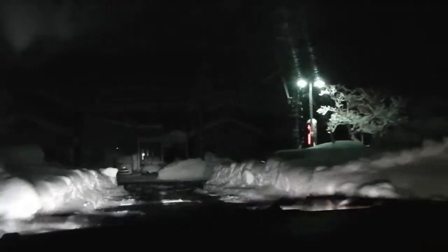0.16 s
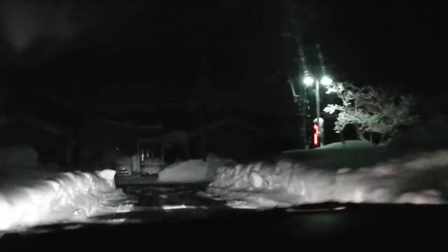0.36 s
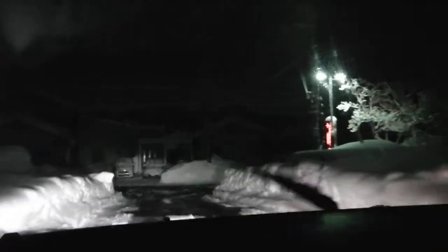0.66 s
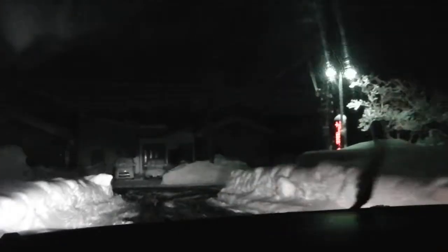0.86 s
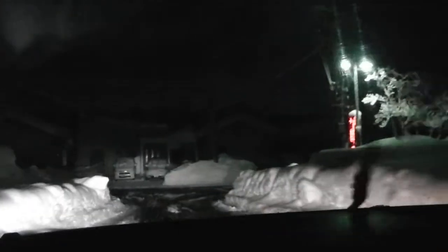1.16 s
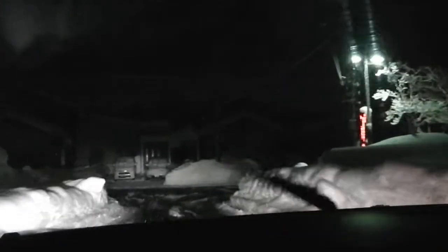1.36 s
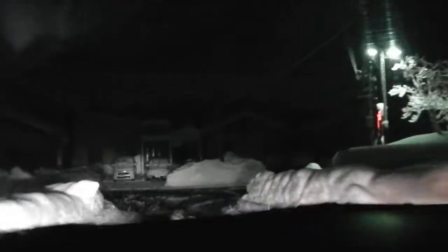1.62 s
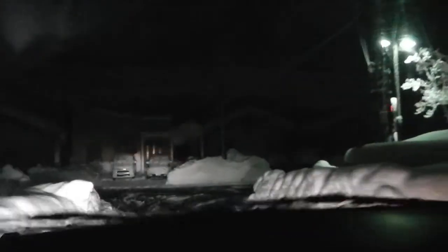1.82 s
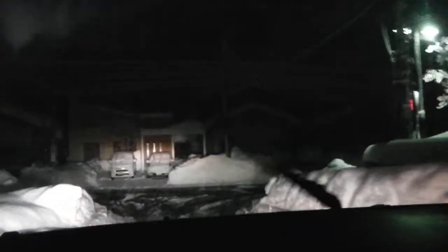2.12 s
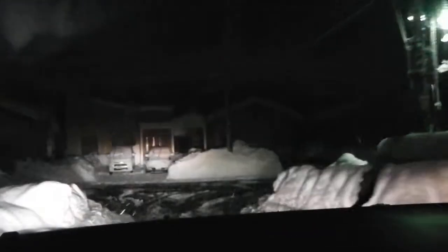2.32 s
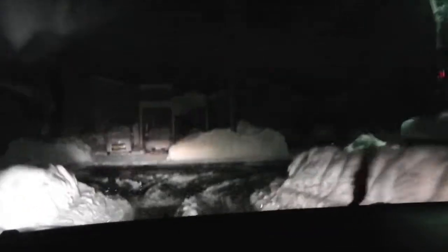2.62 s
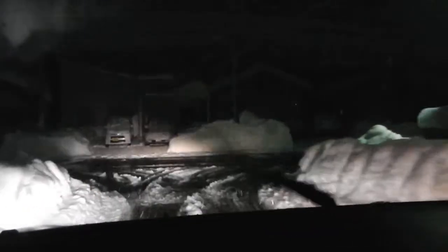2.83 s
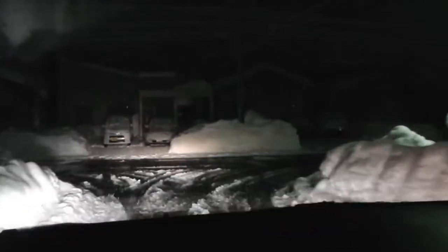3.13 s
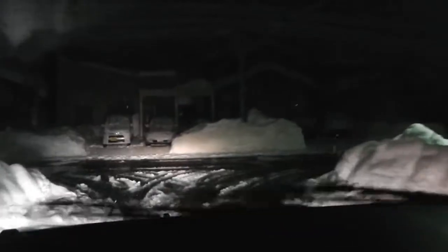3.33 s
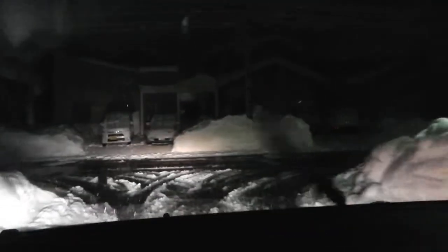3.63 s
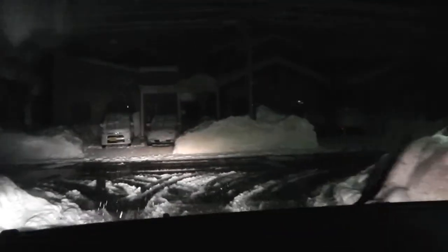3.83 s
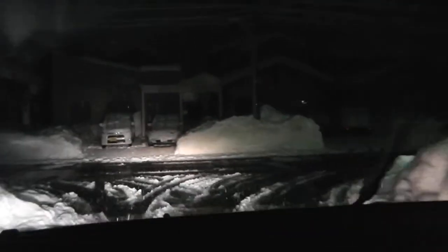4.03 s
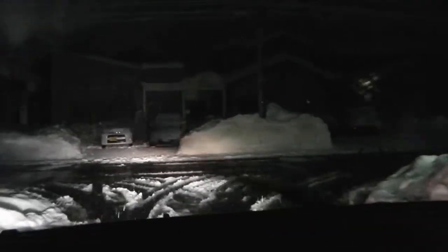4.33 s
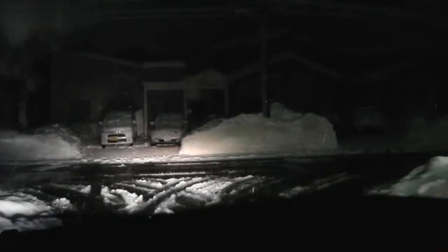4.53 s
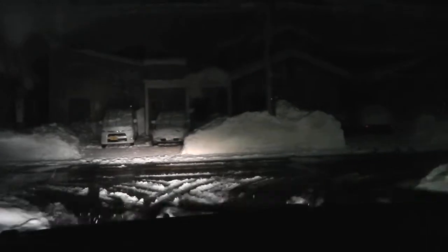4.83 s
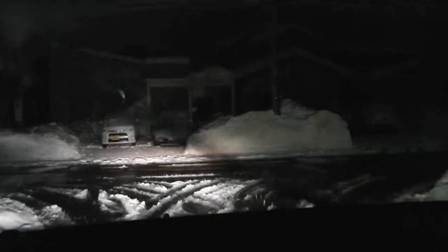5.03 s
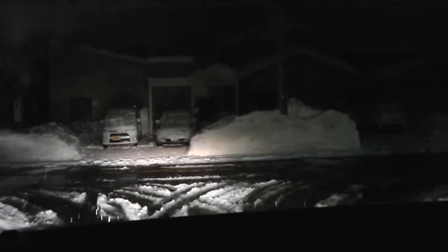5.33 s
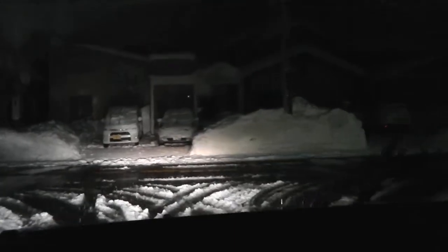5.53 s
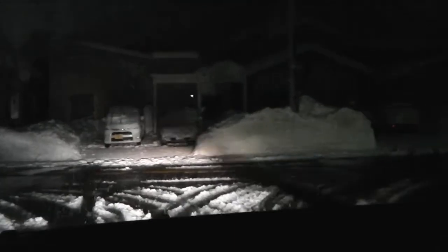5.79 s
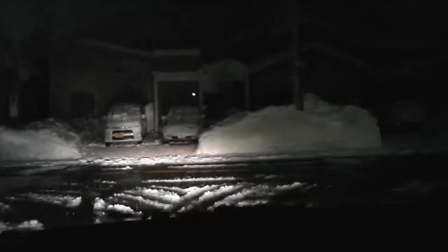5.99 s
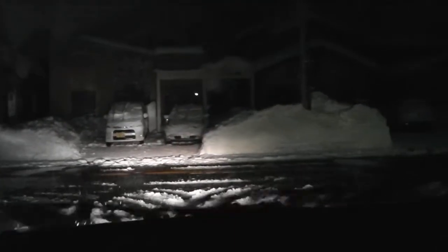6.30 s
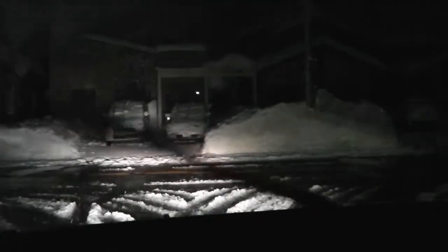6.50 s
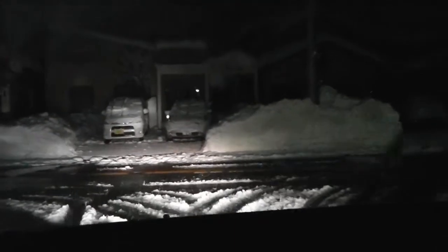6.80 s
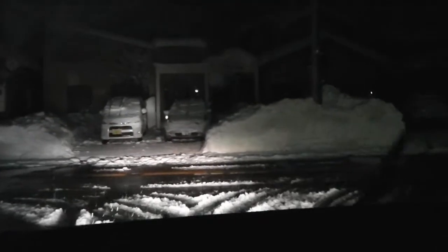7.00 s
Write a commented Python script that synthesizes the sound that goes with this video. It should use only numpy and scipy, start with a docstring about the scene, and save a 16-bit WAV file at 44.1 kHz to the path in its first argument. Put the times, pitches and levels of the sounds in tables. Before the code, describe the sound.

A car creeps over rutted snow, cabin booming softly; wiper blades judder and thump, a stalk clacks, and the turn signal ticks and tocks.

```python
"""Inside a car that creeps over a snowy road and slows for a junction: engine orders drone as sines,
while shaped noises make the heater's hiss, the tyres' rumble and the wash of slush. Drifting tones boom in the cabin.
Ruts, trim and stalk are struck modes and noise bursts; the wipers judder, flip and thump at each turn.
The driver flicks the indicator stalk, and its relay starts to tick and tock."""
import sys
import numpy as np
from scipy import signal
from scipy.fft import rfft, irfft, next_fast_len
from scipy.io import wavfile
from scipy.ndimage import map_coordinates

SR = 44100
rng = np.random.default_rng(int(sys.argv[2]) if len(sys.argv) > 2 else 0)


def generate_wav(signal):
    """Clip the signal to [-1, 1] and save it as 16-bit WAV at the path in sys.argv[1]."""
    frames = np.transpose(np.atleast_2d(signal))
    scaled = np.clip(frames, -1, 1) * 32767
    pcm = np.round(scaled).astype(np.int16)
    wavfile.write(sys.argv[1], SR, pcm)


N = 315315
TIME = np.arange(N) / SR  # the whole scene [s]
AGE = np.arange(SR // 4) / SR  # time since a blow [s]
MID_ONLY = np.array([[1], [0]])
# opposite halves of a level or time difference, for left and right
HALVES = np.array([[.5], [-.5]])
TILT_PIVOT_HZ = 3300  # a tilt leaves this pitch unchanged


def amp(db):
    """Decibels to gain."""
    return 10 ** (np.asarray(db) / 20)


def unit(x):
    """Scale to rms 1."""
    return x / np.sqrt(np.mean(x ** 2) + 1e-20)


def along(points, hz):
    """Read (frequency, value) points on a log frequency axis."""
    f, v = np.transpose(points)
    return np.interp(np.log(hz + 1), np.log(f + 1), v)


def curves(rows):
    """One value per sample for each column after the time."""
    s, *cols = np.transpose(rows)
    return [np.interp(TIME, s, c) for c in cols]


def wobble(rate):
    """A smooth random curve with rate knots a second."""
    knots = rng.standard_normal(int(N * rate / SR) + 4)
    return map_coordinates(knots, [TIME * rate])


def filtered(x, response):
    """Multiply the spectrum of x by a response of frequency."""
    n = x.shape[-1]
    m = next_fast_len(n + SR // 8)
    return irfft(rfft(x, m) * response(np.fft.rfftfreq(m, 1 / SR)), m)[..., :n]


def noise(spectrum, size=N):
    """Two unrelated noises (mid, side) of one colour, together at rms 1."""
    white = rng.standard_normal((2, size))
    return unit(filtered(white, lambda hz: amp(along(spectrum, hz))))


def tone(hz, drift):
    """A sine of rms 1 whose pitch strays by the share drift."""
    cycles = np.cumsum(hz * (1 + drift)) / SR
    return unit(np.sin(2 * np.pi * (cycles + rng.random())))


def fade(t60, attack):
    """The envelope of a blow: a quick rise, then free decay."""
    return (1 - np.exp(-AGE / attack)) * amp(-60 * AGE / t60)


def swell(s, rise_s, t60):
    """The envelope of a soft contact that builds to its peak at time s and then decays."""
    t = TIME - s
    rise = np.exp(-(np.minimum(t, 0) / rise_s) ** 2)
    return rise * amp(-60 * np.maximum(t, 0) / t60)


def burst(spectrum, t60, attack):
    """A blow of set energy on a part with many crowded, well damped modes."""
    envelope = fade(t60, attack)
    blow = noise(spectrum, size=len(AGE)) * envelope
    return blow * np.linalg.norm(envelope) / np.linalg.norm(blow, axis=1, keepdims=True)


def ring(modes, attack):
    """A blow on a part with a few clear modes, each time at slightly new strengths."""
    strengths = amp(2 * rng.standard_normal((len(modes), 2, 1)))
    # each mode reaches the side channel at a phase of its own
    phases = rng.uniform(0, 2 * np.pi, (len(modes), 1, 1)) * np.array([[0], [1]])
    total = 0
    for (hz, db, t60), strength, phase in zip(modes, strengths, phases):
        total = total + strength * amp(db) * np.sin(2 * np.pi * hz * AGE + phase) * fade(t60, attack)
    return total


def tilted(rows, slope_db):
    """Modes or spectrum points made brighter by slope_db per octave."""
    return [(hz, db + slope_db * np.log2(hz / TILT_PIVOT_HZ), *rest) for hz, db, *rest in rows]


def add(track, s, sound):
    """Lay a sound into a track at time s."""
    part = track[:, max(round(s * SR), 0):][:, :sound.shape[1]]
    part += sound[:, :part.shape[1]]


# the car rolls steadily, then slows to a crawl: (time [s], speed [share of the fastest])
SPEED = [(0, 1), (.8, 1), (2.3, 0.92), (3.6, 0.51), (5.2, 0.41), (6.5, 0.31), (7.15, 0.45)]


def with_speed(full_db, doubling_db):
    """Level of a noise that grows with speed: dB at full speed, dB gained per doubling."""
    speed, = curves(SPEED)
    return full_db + doubling_db * np.log2(np.maximum(speed, 1e-2))


# air from the vents: (frequency [Hz], relative level [dB/Hz])
HEATER = [(500, -41), (1100, 6), (1350, 1.5), (1650, 5), (2050, 2), (2500, 1.5), (2950, 1.5), (3800, -2.5),
          (5000, -8), (7000, -14), (9000, -13.5), (16000, -24)]
# the finest treble: (frequency [Hz], relative level [dB/Hz])
FIZZ = [(3000, -6.5), (6500, 1), (9000, -2.5), (12000, -0.5), (16000, 0)]
# how the fizz comes and goes: (time [s], level [dB])
FIZZ_LEVEL = [(0, -60), (.7, -66.5), (1.2, -63), (1.9, -61), (2.6, -62), (3.0, -63), (4.2, -63),
              (4.75, -60), (5.2, -64), (5.9, -64), (6.5, -60.5), (7.1, -55.5)]


def heater():
    """Air hisses from the windscreen vents as shaped noise, with a fine fizz on top."""
    fizz_db, = curves(FIZZ_LEVEL)
    hiss_db = with_speed(full_db=-53.5, doubling_db=1)
    hiss = amp(hiss_db + 0.38 * wobble(3.23)) * noise(HEATER)
    fizz = amp(fizz_db + 0.19 * wobble(6.0)) * noise(FIZZ)
    return hiss + fizz


# the engine pulls through the rutted bend, then falls to idle:
# (time [s], drone pitch [Hz], drone level [dB])
ENGINE = [(0, 85.8, -48), (.7, 89.1, -40.5), (1.3, 91, -43), (2.1, 89.73, -37), (2.5, 90.24, -34),
          (2.9, 88.5, -34.5), (3.2, 86, -36), (3.6, 91.2, -32), (4.0, 87, -42.5), (4.7, 73.85, -43),
          (5.9, 75, -48.5)]
# (multiple of the drone pitch, relative level [dB])
ENGINE_ORDERS = [(1, -4.5), (2, -18)]
# hum of the idling engine: (frequency [Hz], level [dB])
IDLE = [(101, -45.5), (152, -50)]
IDLE_FROM_S, IDLE_RISE_S = 5, 0.35  # the hum comes forward as the car slows


def engine():
    """Low engine orders drone through the body, a little uneven; a fainter hum joins at idle."""
    hz, drone_db = curves(ENGINE)
    phase = 2 * np.pi * np.cumsum(hz * (1 + 0.02214 * wobble(18))) / SR
    drone = sum(amp(db + 2.5 * wobble(10)) * np.sin(k * phase) for k, db in ENGINE_ORDERS)
    hum = sum(amp(db) * tone(idle_hz, .015 * wobble(8)) for idle_hz, db in IDLE)
    hum_gain = np.clip((TIME - IDLE_FROM_S) / IDLE_RISE_S, 0, 1)
    return (amp(drone_db) * unit(drone) + hum_gain * hum) * MID_ONLY


# how lumpy the packed snow is: (time [s], suspension rumble level [dB])
LUMPS = [(0, -32.5), (.8, -38.5), (1.1, -48), (2.0, -41.5), (2.8, -35), (3.3, -38.5), (3.8, -38),
         (4.5, -40), (5.9, -43.5), (6.3, -42.5), (7.1, -41)]
# suspension rumble: (frequency [Hz], relative level [dB/Hz])
RUMBLE = [(12, -43), (25, -9), (36, -1), (52, -2), (70, 0), (100, -8.5), (200, -61), (600, -120)]
# booming cabin air: (frequency [Hz], relative level [dB/Hz])
BOOM = [(45, -6.5), (78, 0.5), (98, 3.5), (125, -1.5), (160, -1.5), (190, -5.5), (220, -14.5), (280, -20.5),
        (400, -33), (900, -59), (2500, -120)]
# slush under the wheels: (frequency [Hz], relative level [dB/Hz])
WASH = [(200, -2), (300, -4.5), (345, -1.5), (385, 6.5), (430, -1), (490, 2.5), (560, -1.5), (680, 2),
        (830, -3.5), (1000, -7.5), (1300, -17.5), (2500, -36), (6000, -66)]


def tyres():
    """Packed snow shakes the suspension and makes the air boom; slush washes evenly underneath."""
    rumble_db, = curves(LUMPS)
    rumble = amp(rumble_db + 2.9 * wobble(13)) * noise(RUMBLE)
    boom_db = with_speed(full_db=-33, doubling_db=4.6)
    boom = amp(boom_db + 1.57 * wobble(9.9)) * noise(BOOM)
    wash = amp(with_speed(full_db=-45.5, doubling_db=0.75)) * noise(WASH)
    return rumble + boom + wash


# air resonances of the cabin:
# (frequency [Hz], level at full speed [dB], gain per doubling of speed [dB])
BOOMS = [(121.6, -36, 6.5), (153.6, -38, 9), (185.2, -42.5, 9)]
BOOM_DRIFT, BOOM_SURGE_DB = .045, 4  # unsteadiness of pitch (share) and of level


def booms():
    """The road drives the cabin's air resonances, each drifting and surging in its own time."""
    out = np.zeros(N)
    for hz, full_db, doubling_db in BOOMS:
        note = tone(hz, BOOM_DRIFT * (wobble(3) + 0.708 * wobble(25)))
        surging = unit(amp(BOOM_SURGE_DB * wobble(17)) * note)
        out += amp(with_speed(full_db, doubling_db)) * surging
    return out * MID_ONLY


# the wheels drop into ruts: (time [s], low jolt level [dB], clunk level [dB])
RUTS = [(2.048, -38, -31.5), (2.111, -25, -32), (2.634, -42, -27.5), (2.765, -17, -35), (3.238, -47, -34.5),
        (4.689, -46, -37)]
# modes of the springs: (frequency [Hz], level relative to the jolt [dB], t60 [s])
SUSPENSION = [(42.3, -4, 0.11), (67, -4, 0.13)]
# the underbody: (frequency [Hz], relative level [dB/Hz])
CLUNK = [(100, -46), (380, 15), (550, 0), (800, 2), (1100, -14), (3000, -46), (9000, -53)]
# slush spraying a wheel arch: (frequency [Hz], relative level [dB/Hz])
SLUSH = [(300, -12), (800, 3), (1800, 2), (3800, 0), (5000, -14), (16000, -38)]
SLUSH_S, SLUSH_DB, SLUSH_RISE_S = 3.228, -48.5, .045  # the spray peaks as the wheel nears a rut


def ruts():
    """A wheel drops: the springs jolt and the underbody clunks; once, slush sprays up first."""
    spray = swell(SLUSH_S, SLUSH_RISE_S, t60=.08) * amp(2.5 * wobble(200))
    out = amp(SLUSH_DB) * spray * noise(SLUSH)
    for s, jolt_db, clunk_db in RUTS:
        jolt = amp(jolt_db) * ring(SUSPENSION, attack=0.0051)
        clunk = amp(clunk_db) * burst(CLUNK, t60=0.087, attack=0.0044)
        add(out, s, jolt + clunk)
    return out


# a faint, high brushing sound: (frequency [Hz], relative level [dB/Hz])
BRUSH = [(3000, -23), (6500, -7), (9000, -2), (16000, -2)]


def brush():
    """One soft contact of high noise."""
    return amp(-52) * swell(1.962, rise_s=.008, t60=0.072) * noise(BRUSH)


CRACK_RISE_S = .001  # rise of the cracks and rings of hard plastic parts
# dashboard trim creaks and snaps:
# (time [s], level [dB], t60 [s], pitch of the part [Hz], tilt [dB per octave])
SNAPS = [(0.327, -43, 0.073, 3250, -6), (2.177, -28, 0.022, 4770, 0), (2.769, -34.5, 0.027, 3900, 2),
         (3.24, -40.5, 0.035, 4400, 4), (4.553, -39, 0.029, 4000, 2), (4.573, -44, .028, 4100, 3),
         (4.677, -36.5, 0.032, 4500, 3), (4.693, -51, .08, 3900, 0), (5.001, -44, 0.043, 4100, 4),
         (6.191, -41, 0.034, 3480, -5)]
# panel spectrum before the tilt: (frequency [Hz], relative level [dB/Hz])
PANEL = [(500, -32), (1400, 7.5), (2100, 5), (3000, 5), (3900, 9.5), (4900, 2), (5800, 0), (7200, -16),
         (10000, -15), (16000, -23)]
PART_DB, PART_SHARE = -4, 0.59  # the part's note: level relative to its crack, share of the crack's t60


def snaps():
    """The dashboard cracks as the body twists: a burst of panel noise and one short note."""
    out = np.zeros((2, N))
    for s, db, t60, pitch_hz, tilt_db in SNAPS:
        crack = burst(tilted(PANEL, tilt_db), t60, CRACK_RISE_S)
        note = ring([(pitch_hz, PART_DB, PART_SHARE * t60)], CRACK_RISE_S)
        add(out, s, amp(db) * (crack + note))
    return out


# hollow knocks of column and dashboard: (time [s], level [dB], t60 [s])
KNOCKS = [(.327, -45.5, 0.13), (1.375, -30.5, 0.06), (1.713, -37, .04), (1.724, -23.5, 0.047),
          (1.747, -40.5, 0.14), (2.109, -42, .031), (2.178, -38, 0.051), (2.771, -30.5, 0.038),
          (4.693, -44, 0.28)]
# hollow parts: (frequency [Hz], relative level [dB/Hz])
HOLLOW = [(60, -8), (120, -16), (280, -8), (390, 13), (520, -1), (750, 10), (930, -5), (1150, 3),
          (1400, -2), (1850, -4), (2800, -1), (4200, -22), (7000, -36), (16000, -24)]
# clear modes of the column: (frequency [Hz], relative level [dB], t60 [s])
COLUMN = [(383, -5, 0.11), (473, 2, 0.073), (780, -5, 0.08), (1015, 2, 0.071)]
COLUMN_DB = -15.5  # gain on those modes, relative to the knock


def knocks():
    """A knock excites crowded hollow modes and, more faintly, the clear modes of the column."""
    out = np.zeros((2, N))
    for s, db, t60 in KNOCKS:
        knock = burst(HOLLOW, t60, CRACK_RISE_S)
        add(out, s, amp(db) * (knock + amp(COLUMN_DB) * ring(COLUMN, CRACK_RISE_S)))
    return out


# the indicator stalk rides over its detents:
# (time [s], level [dB], t60 [s], ring relative to the crack [dB], tilt of the ring [dB per octave])
FLICKS = [(1.078, -44, 0.076, -14, 5), (1.319, -38, .05, -5, -4), (1.325, -29, 0.075, -5.5, -3.5),
          (1.357, -37.5, 0.079, -17, -2), (1.364, -36, 0.063, -18, 9), (1.374, -29.5, 0.06, -11.5, 3),
          (1.675, -45.5, 0.16, -18, 1), (1.712, -27.5, 0.067, -13.5, -1), (1.72, -31, 0.045, -15, 5)]
# crack of the plastic: (frequency [Hz], relative level [dB/Hz])
PLASTIC = [(400, -6), (1250, -2.5), (1650, 3), (2150, -3), (3300, 3), (3950, -1), (5400, 2.5), (6300, -8),
           (7200, -8.5), (10000, -9.5), (16000, -10)]
# modes of the stalk before the tilt: (frequency [Hz], relative level [dB], t60 [s])
STALK = [(1616, 1.5, 0.067), (3000, -6, 0.06), (3270, 2.5, 0.052), (4170, -5, .05), (5220, -2, 0.047),
         (5640, -5, 0.049), (6380, -13, .06)]


def flicks():
    """Each detent cracks as a plastic burst and sets the stalk's modes ringing."""
    out = np.zeros((2, N))
    for s, db, t60, ring_db, tilt_db in FLICKS:
        crack = burst(PLASTIC, t60, attack=0.0023)
        stalk = ring(tilted(STALK, tilt_db), CRACK_RISE_S)
        add(out, s, amp(db) * (crack + amp(ring_db) * stalk))
    return out


def trim():
    """Plastic parts brush, snap, knock and flick; a fast flutter of level makes them chatter."""
    chatter = amp(1.6 * wobble(700))
    return (brush() + snaps() + knocks() + flicks()) * chatter


# the wipers turn round: (time [s], judder level [dB], build-up of the judder [s], linkage tick level [dB],
# blade slap level [dB], delay of the rubber's flip [s], flip level [dB])
TURNS = [(1.017, -33.5, 0.061, -44, -45, 0.032, -32.5), (2.504, -36, 0.086, -51, -45, 0.00706, -41),
         (3.939, -32, 0.056, -46, -34.5, 0.042, -36.5), (5.429, -34.5, 0.082, -45.5, -31.5, 0.033, -40.5),
         (6.917, -34.5, 0.1, -44.5, -46, 0.039, -34)]
# the linkage takes up its play twice before every turn and jerks the blades:
# (lead [s], tick relative to the turn's tick [dB], jerk relative to the judder [dB])
PLAY = [(.073, -1.5, -15), (0.036, -3.5, -4)]
# a linkage joint: (frequency [Hz], relative level [dB/Hz])
JOINT = [(1500, -49), (2700, 6), (3100, 7), (3500, -8), (4500, -33), (12000, -49)]
# juddering blades: (frequency [Hz], relative level [dB/Hz])
JUDDER = [(50, -11), (110, 12.5), (160, 13.5), (195, 12), (260, -5.5), (390, 3), (520, 1.5), (750, -5.5),
          (1200, -15.5), (2200, -22), (3000, -26), (5000, -41), (12000, -55)]
# slap of the blades: (frequency [Hz], relative level [dB/Hz])
SLAP = [(400, -1.5), (1000, -8), (1550, 3.5), (2000, -0.5), (2700, -3), (3500, -14), (4200, -14.5),
        (6000, -21), (14000, -34)]
# rubbing rubber: (frequency [Hz], relative level [dB/Hz])
RUBBER = [(120, -1), (280, -11), (400, 11), (750, 8), (1050, 3), (1400, -5), (1800, -7), (2500, -20),
          (6000, -20), (12000, -65)]
# notes of a blade as its rubber rolls over: (frequency [Hz], relative level [dB])
BLADE = [(390, 1.5), (530, 1), (690, -0.5), (830, -5.5), (1040, -4.5), (1430, -8.5)]
# modes of the wiper arms: (frequency [Hz], relative level [dB], t60 [s])
ARMS = [(383, -9, 0.19), (503, -7, 0.2), (733, 11, .059)]
JUDDER_LAG_S, JUDDER_FADE_S = 0.0046, 0.071  # the judder peaks just after the turn, then dies away
FLIP_RISE_S, FLIP_T60_S = 0.011, .11
ARMS_DB, SCUFF_DB = -6, -5.5  # gain of the arms' ring and of the rubbing noise, relative to the flip
BLADE_WANDER = 0.0295  # unsteadiness of the notes as a share of their pitch


def wipers():
    """Around each turn the linkage ticks, the blades judder and slap, and the rubber flips over."""
    out, drag, flip = np.zeros((2, N)), np.zeros(N), np.zeros(N)
    for s, judder_db, build_s, tick_db, slap_db, flip_s, flip_db in TURNS:
        t = TIME - s - JUDDER_LAG_S
        drag += amp(judder_db) * np.exp(-np.abs(t) / np.where(t < 0, build_s, JUDDER_FADE_S))
        for lead_s, play_db, jerk_db in PLAY:
            tick = amp(tick_db + play_db) * burst(JOINT, t60=0.068, attack=0.00078)
            jerk = amp(judder_db + jerk_db) * burst(RUBBER, t60=0.07, attack=0.0055)
            add(out, s - lead_s, tick + jerk)
        add(out, s, amp(slap_db) * burst(SLAP, t60=0.077, attack=0.00038))
        # the rubber rolls over, sounds the blade's notes and sets the arms ringing
        flip += amp(flip_db) * swell(s + flip_s, FLIP_RISE_S, FLIP_T60_S)
        add(out, s + flip_s, amp(flip_db + ARMS_DB) * ring(ARMS, attack=0.0016))
    notes = sum(amp(db) * tone(hz, BLADE_WANDER * wobble(90)) for hz, db in BLADE)
    judder = amp(1.5 * wobble(70)) * noise(JUDDER)
    scuff = amp(SCUFF_DB) * noise(RUBBER)
    return out + drag * judder + flip * (unit(notes) * MID_ONLY + scuff)


# the wiper arms thump the cowl as they stop and swing back:
# (time [s], level [dB], pitch [Hz], ring of the cowl relative to the thump [dB])
THUMPS = [(1.016, -14.5, 129.4, -2.5), (2.481, -22, 102, -1), (2.534, -23, 132, -3), (3.889, -20, 107, -3),
          (3.921, -20, 96, -5), (3.945, -18.5, 126.8, -4), (5.43, -20.5, 116, -2),
          (5.451, -19, 143.4, -4.5), (6.894, -27, 112, -1), (6.92, -18, 109, -7)]
# modes of the cowl: (frequency [Hz], relative level [dB], t60 [s])
COWL = [(158.4, -15.5, 0.53), (189, -9.5, 0.22), (393.3, -12, 0.23)]
THUMP_RISE_S, THUMP_T60_S = 0.011, 0.11


def thumps():
    """The arms load the cowl for a few low cycles and leave it ringing faintly."""
    out = np.zeros((2, N))
    for s, db, hz, ring_db in THUMPS:
        cycles = np.sin(2 * np.pi * hz * (TIME - s))
        out[0] += amp(db) * swell(s, THUMP_RISE_S, THUMP_T60_S) * cycles
        add(out, s, amp(db + ring_db) * ring(COWL, attack=0.004))
    return out


# the stalk hits its end stop and the blow bends the steering column:
# (time [s], clack peak level [dB], delay of the low thud [s], thud level [dB], thud pitch [Hz])
STOPS = [(1.368, -31, 0.036, -20.5, 120), (1.7129, -20.5, 0.017, -23, 149.4)]
# the clack: (frequency [Hz], relative level [dB/Hz])
STOP = [(120, -14), (300, -6), (480, 3.5), (1050, 3.5), (1600, -10), (2400, -13.5), (3400, -24),
        (4200, -19), (6000, -18), (9000, -37)]
BEND_LAG_S, BEND_HZ = .017, 2987  # how late the bass arrives, and the pitch over which the lag shrinks
STOP_RISE_S, STOP_T60_S = 0.01, 0.24  # the thud


def end_stops():
    """One solid blow runs along the column as bending waves, treble first; a low thud follows."""
    out = np.zeros((2, N))
    hz = np.fft.rfftfreq(len(AGE), 1 / SR)
    lag = BEND_LAG_S * np.exp(-hz / BEND_HZ)
    # the phase is the lag summed over frequency
    delay = np.exp(-2j * np.pi * np.cumsum(lag) * hz[1])
    clack = irfft(amp(along(STOP, hz)) * delay, len(AGE))[:len(AGE) // 2]
    clack = clack / np.abs(clack).max() * np.array([[1], [.5]])
    for s, db, thud_s, thud_db, thud_hz in STOPS:
        add(out, s, amp(db) * clack)
        thud = swell(s + thud_s, STOP_RISE_S, STOP_T60_S) * np.sin(2 * np.pi * thud_hz * (TIME - s))
        out[0] += amp(thud_db) * thud
    return out


# the relay's plastic case: (frequency [Hz], relative level [dB/Hz])
CASE = [(700, 4), (1400, -0.5), (2300, 0), (2900, 8.5), (3800, 10), (4600, -8), (5400, -4), (6100, -11),
        (7300, -0.5), (8500, -13), (11500, -14), (16000, -24)]
# modes struck by the contact: (frequency [Hz], relative level [dB], t60 [s])
RELAY = [(663, -7, 0.11), (1178, -12.5, 0.079), (2076, -7.5, 0.056), (2876, 6, 0.027), (3624, -5, 0.031),
         (6170, -9.5, 0.019)]
# the armature's bounce: (frequency [Hz], relative level [dB/Hz])
REBOUND = [(1500, -16), (2800, -1), (3650, 5), (4200, -15), (5000, -20), (7000, -12), (9000, -23),
           (16000, -32)]
# the release: (frequency [Hz], relative level [dB/Hz])
TOCK = [(700, -6.5), (1500, -8), (2300, 4.5), (3000, 0), (3600, -8), (4300, -1), (5200, -11.5),
        (6100, -3.5), (7200, -16), (9700, -8.5), (13800, -9), (16000, -8.5)]
BLINK_START_S, BLINK_PERIOD_S = 1.699, .6822
REBOUND_S, RELEASE_S = 0.0083, .3405  # after the relay's pull
CASE_DB, CONTACT_DB, REBOUND_DB, TOCK_DB = -37.5, -35.5, -41.5, -38


def indicator():
    """The relay rings in its case and bounces once as it pulls in, and gives a tock as it lets go."""
    out = np.zeros((2, N))
    for s in np.arange(BLINK_START_S, N / SR, BLINK_PERIOD_S):
        add(out, s - .001, amp(CASE_DB) * burst(CASE, t60=.06, attack=.003))
        # the contact lands just after the armature starts to move
        add(out, s + .002, amp(CONTACT_DB) * ring(RELAY, attack=.001))
        add(out, s + REBOUND_S, amp(REBOUND_DB) * burst(REBOUND, t60=.03, attack=.001))
        add(out, s + RELEASE_S, amp(TOCK_DB) * burst(TOCK, t60=.065, attack=.002))
    return out


# how long the cabin echoes: (frequency [Hz], t60 [s])
CABIN = [(200, 0.52), (2000, 0.09), (12000, 0.087)]


def cabin(x):
    """The short, padded echo of the cabin: noise that decays at its own rate in every band."""
    hz, t, z = signal.stft(rng.standard_normal((2, SR // 4)), SR, nperseg=256)
    decay = amp(-60 * t / along(CABIN, hz)[:, None])
    tail = signal.istft(z * decay, SR, nperseg=256)[1]
    return signal.fftconvolve(x, tail / np.linalg.norm(tail[0]), axes=1)[:, :N]


# stereo width: (frequency [Hz], gain on the side signal [dB])
WIDTH = [(100, -23), (300, -15.5), (700, -14), (1400, -6.5), (3000, -2.5), (6000, 3.5), (10000, 4.5),
         (15000, 3)]
# stereo balance: (frequency [Hz], left minus right [dB])
LEAN = [(110, 3), (260, 2), (550, 1), (1200, 0.1), (2300, -1.5), (4400, 0), (8000, 0.5), (14000, -0.5)]
LEFT_LEADS_S, LEAD_BELOW_HZ = 6e-5, 1500  # low sound reaches the left port first


def microphones(pair):
    """Bass reaches both ports nearly alike; towards the treble they differ more and more."""
    mid, side = filtered(pair, lambda hz: np.array([np.ones_like(hz), amp(along(WIDTH, hz))]))

    def port(hz):
        lead_s = HALVES * LEFT_LEADS_S * np.exp(-hz / LEAD_BELOW_HZ)
        return amp(HALVES * along(LEAN, hz)) * np.exp(2j * np.pi * hz * lead_s)
    return filtered(np.array([mid + side, mid - side]), port)


# extra width of the clicks: (frequency [Hz], added side level [dB])
CLICK_WIDTH = [(1200, -5), (4200, -1.5), (8000, 4)]
# extra lean of the clicks: (frequency [Hz], left minus right [dB])
CLICK_LEAN = [(1000, 0.5), (2200, 0), (4200, -1.5), (8000, -4), (14000, 1.5)]


def scene():
    """The car all around; the clicks come from close by, a little to the right, wide in the treble."""
    road = heater() + engine() + tyres() + booms() + ruts()
    car = microphones(road + wipers() + thumps() + end_stops())
    side_only = np.array([[0], [1]])
    clicks = filtered(trim() + indicator(), lambda hz: amp(side_only * along(CLICK_WIDTH, hz)))
    clicks = microphones(clicks + amp(-7.5) * cabin(clicks))
    return car + filtered(clicks, lambda hz: amp(HALVES * along(CLICK_LEAN, hz)))


TOP_HZ = 15900  # nothing sounds above this


def record(dry):
    """The recorder has a narrow dip in the treble and a band limit."""
    def response(hz):
        dip = amp(-8 * np.exp(-((hz - 7850) / 420) ** 2))
        return dip * (hz < TOP_HZ)
    return filtered(dry, response)


dry = scene()
out = record(dry)
generate_wav(out)
```